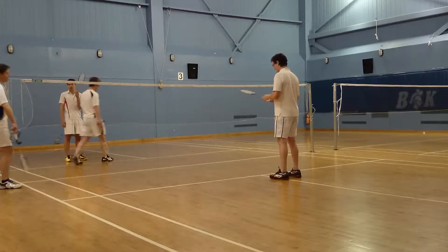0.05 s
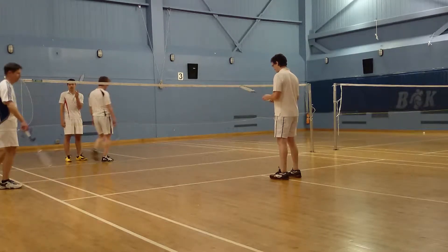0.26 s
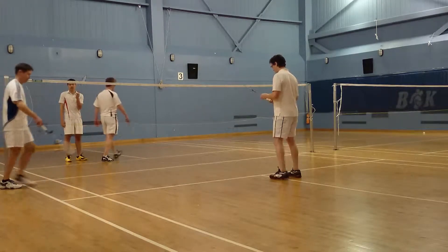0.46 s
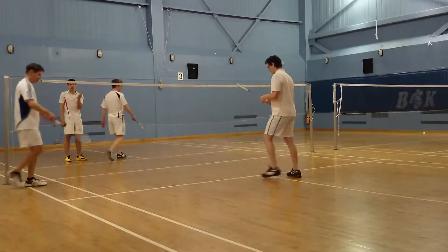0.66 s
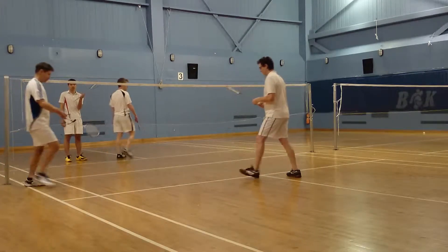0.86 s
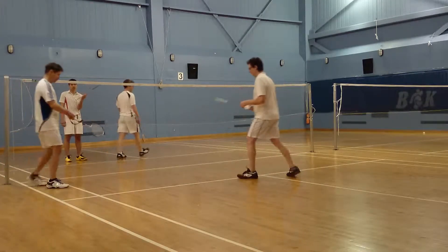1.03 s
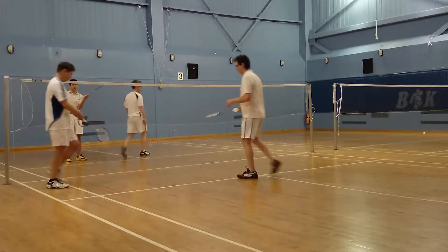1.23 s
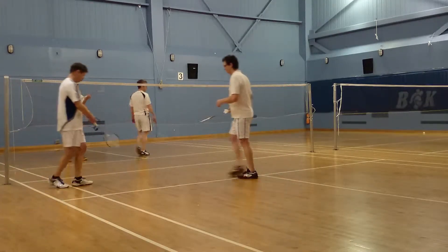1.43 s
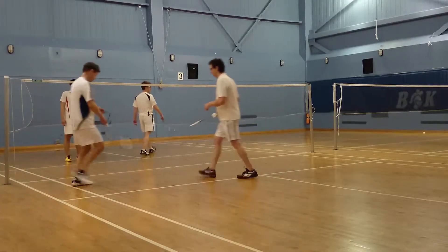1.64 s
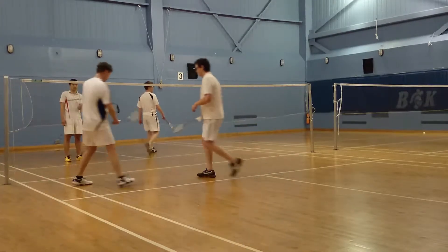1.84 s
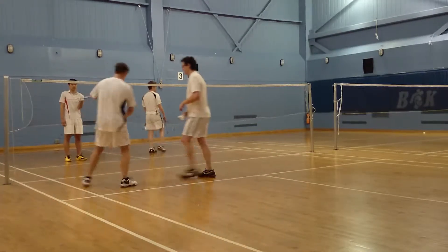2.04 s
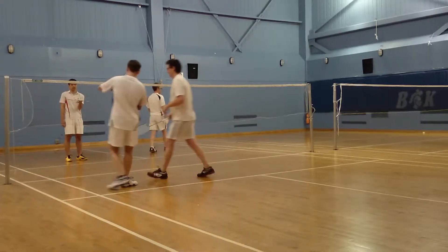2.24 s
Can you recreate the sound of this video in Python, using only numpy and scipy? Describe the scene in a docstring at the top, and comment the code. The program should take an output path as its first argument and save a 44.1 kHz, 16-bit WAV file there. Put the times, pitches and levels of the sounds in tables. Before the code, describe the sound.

Sports shoes squeak on a wooden court in a big, echoing hall. Soft, dull steps come at 0.1 seconds, with a faint chirp at 0.4. A tiny sharp squeak with taps comes at 0.6, a clearer falling squeak and thud at 1.03, and the loudest, brightest, rough chirp at 1.46. Its echo fades into faint scuffs and a soft step around 2.0, over low ventilation rumble.

```python
"""Squeaking soles of badminton players, close and far, on the wooden court of a large sports hall.
Each squeak is the rubber tread sticking and slipping for milliseconds: a rough gliding tone with harmonics.
Landings are decaying noises (tick, slap, boom of the boards); scuffs are short swells of treble noise.
The hall answers with a few echoes and a long diffuse tail, over the low rumble and air noise of ventilation.
Two microphones hear the shoes with different colour and a slight lag; a limiter and a treble cut follow."""
import sys
import numpy as np
from scipy import signal
from scipy.fft import rfft, irfft
from scipy.io import wavfile
from scipy.ndimage import uniform_filter1d, minimum_filter1d

SR = 44100
rng = np.random.default_rng(int(sys.argv[2]) if len(sys.argv) > 2 else 0)


def to_wav(sig):
    """Store sig (one row per channel, or 1-D mono) as 16-bit WAV at the path in sys.argv[1].

    Samples outside -1..1 are clipped; the rate is SR.
    """
    pcm = np.clip(np.atleast_2d(sig), -1, 1) * 32767
    pcm = np.round(pcm).astype(np.int16)
    wavfile.write(sys.argv[1], SR, pcm.T)  # frames by channels


N = 101077  # length in samples

# Colour of a sole ticking on or brushing the varnish: columns [f/Hz, relative level/dB]
VARNISH_COLOUR = [(1000, -8), (3000, 4.5), (5000, -3), (8000, -0.5), (12000, -21.5), (14500, -28)]


def undb(db):
    """Turn decibels into an amplitude factor."""
    return 10 ** (np.asarray(db) / 20)


def unit(x):
    """Scale to rms 1."""
    return x / np.sqrt(np.mean(x ** 2) + 1e-20)


def over(points, hz):
    """Read (f/Hz, value) points on a log-frequency axis."""
    f, values = np.array(points, float).T
    return np.interp(np.log(np.maximum(hz, 1)), np.log(f), values)


def bins(size):
    """Frequencies in Hz of the spectrum of a sound of this many samples."""
    return np.fft.rfftfreq(size, 1 / SR)


def tint(x, points):
    """Filter by (f/Hz, level/dB) points, padded so that the end does not wrap round."""
    padded = 2 * len(x)
    spectrum = rfft(x, padded) * undb(over(points, bins(padded)))
    return irfft(spectrum)[:len(x)]


def noise(points, size):
    """Noise coloured by (f/Hz, level/dB) points, rms 1."""
    spectrum = rfft(rng.standard_normal(size)) * undb(over(points, bins(size)))
    return unit(irfft(spectrum, size))


def wander(hz, size):
    """Smooth random movement, rolled off above a given rate, rms 1."""
    spectrum = rfft(rng.standard_normal(size)) / (1 + (bins(size) / hz) ** 4)
    return unit(irfft(spectrum, size))


def pan(db):
    """Left and right gains for a level difference; positive is louder on the left."""
    difference = np.atleast_1d(db)
    return undb(np.array([difference, -difference]) / 2)


def add(out, start, x):
    """Mix a sound in at a time in seconds, cut off at the end of the scene."""
    i = int(start * SR)
    out[..., i:i + x.shape[-1]] += x[..., :N - i]


def slide(u):
    """Force of a sliding sole over its length u = 0-1: it swells, then fades."""
    swell_share, swell_power, fade_power = 0.49, 1.38, 0.61
    rise = np.clip(u / swell_share, 0, 1)
    fall = np.clip((1 - u) / (1 - swell_share), 0, 1)
    return rise ** swell_power * fall ** fade_power


def ventilation():
    """A low tone wavering in pitch and level makes the rumble; broad stereo noise makes the air."""
    # Colour of the air noise: columns [f/Hz, relative level/dB]
    air_colour = [(20, -4.5), (35, -2), (60, -1), (87, -9), (122, -9.5), (180, -13), (240, -19),
                  (320, -31.5), (480, -31), (620, -34), (1000, -41), (2400, -47), (3000, -52),
                  (4900, -53.5), (5700, -48), (6600, -52.5), (9000, -58), (12400, -59), (14000, -67)]
    # Lean of the air noise between the microphones: columns [f/Hz, left-right level/dB]
    air_lean = [(40, -9.5), (120, -5), (300, -3), (1000, -0.5), (3000, -3.5), (5600, -6.5), (8500, 3.5),
                (14000, -2)]
    # Width of the air noise: columns [f/Hz, side against mid level/dB]
    air_width = [(60, -11), (130, -4), (300, -12.5), (700, -0.5), (14000, 0.5)]
    # Rise and fall of the rumble: columns [t/s, relative level/dB]
    rumble_course = [(0.0, -47), (0.11, -25), (0.2, -46.5), (0.33, -29), (0.4, -64), (0.45, -31.5),
                     (0.69, -37.5), (0.72, -65), (0.77, -25.5), (0.81, -43.5), (0.94, -32.5), (1.03, -46),
                     (1.25, -34), (1.46, -36.5), (1.5, -55), (1.57, -36.5), (1.61, -48.5), (2.29, -43)]
    air_db, air_dip_db = -43, -1  # the air noise is weaker around the rumble
    rumble_hz, rumble_width_hz, rumble_pan_db = 57.6, 10.95, -6.5
    rumble_db, level_waver = -4, 0.083

    t, f = np.arange(N) / SR, bins(N)
    dip = undb(air_dip_db * np.exp(-((f - rumble_hz) / (2 * rumble_width_hz)) ** 2))
    mid = rfft(noise(air_colour, N))
    side = rfft(noise(air_colour, N)) * undb(over(air_width, f))
    air = irfft(np.array([mid + side, mid - side]) * dip * pan(over(air_lean, f)), N)
    air = air * undb(air_db)

    pitch = rumble_hz + rumble_width_hz / 2 * wander(8.9, N)
    phase = 2 * np.pi * np.cumsum(pitch) / SR
    rumble = unit(np.sin(phase) * (1 + level_waver * wander(rumble_width_hz, N)))
    level = undb(rumble_db + np.interp(t, *np.array(rumble_course).T))
    return air + rumble * level * pan(rumble_pan_db)


def hall(x):
    """A few distinct echoes and a diffuse stereo tail, whose treble dies sooner than its middle."""
    # Time for the tail to fall by 60 dB: columns [f/Hz, decay time/s]
    decay_times = [(100, 0.85), (1000, 1.68), (2900, 1.223), (4400, 0.91), (5800, 0.61), (8500, 0.51),
                   (12000, 0.41), (16000, .33)]
    # Width of the tail: columns [f/Hz, side against mid level/dB]
    tail_width = [(200, -4.5), (1000, 1.5), (3000, 2), (4400, 3.5), (6000, -0.5), (12000, 2)]
    # Echoes from floor, walls and roof: columns [nominal delay/s, level/dB]
    echoes = [(.005, -7), (0.022, -16), (0.031, -15.5), (0.047, -25), (0.069, -19.5), (.110, -24.5)]
    build_s, gap_s, grain_spread = 0.012, 0.0023, 0.67

    t, f = np.arange(N) / SR, bins(N)
    grain = np.exp(grain_spread * rng.standard_normal((2, N)))  # uneven strength of the reflections
    field = rfft(unit(rng.standard_normal((2, N)) * grain))
    centres = np.geomspace(100, 16000, 20)
    tail = 0
    for hz, share in zip(centres, np.eye(len(centres))):
        band = irfft(field * np.interp(f, centres, share), N)  # overlapping bands that sum to the field
        tail = tail + band * np.exp(-np.log(1000) * t / over(decay_times, hz))
    build = 1 - np.exp(-np.maximum(t - gap_s, 0) / build_s)
    tail = tail * build / np.sqrt(SR / 10)

    mid = tail.mean(0)
    side = tint(tail[0] - mid, tail_width)
    tail = mid + side * np.array([[1], [-1]])
    for delay, db in echoes:
        for channel in tail:
            scattered = delay + 0.002 * rng.uniform(-1, 1)  # differs between the microphones
            channel[int(scattered * SR)] += undb(db)
    return signal.fftconvolve(x[None], tail, axes=1)[:, :N]


def scuffs(size=8192):
    """A sole brushes the varnish without catching: treble noise follows the force of the slide."""
    # Brushing soles: columns [t/s, length/s, relative level/dB]
    brushes = [(0.51, 0.029, -60.5), (0.6, 0.036, -47), (1.817, 0.045, -57), (2.031, 0.055, -60)]
    out, t = np.zeros(N), np.arange(size) / SR
    for start, length, db in brushes:
        add(out, start, undb(db) * slide(t / length) * noise(VARNISH_COLOUR, size))
    return out


def steps(size=16384):
    """Each landing ticks on the varnish, slaps and sets the sprung boards booming: three decaying noises."""
    # Landing soles: columns [t/s, relative boom level/dB, slap level/dB, tick level/dB]
    landings = [(0.058, -42, -68, -80), (.134, -41.5, -41, -62), (0.5826, -47, -35, -33.5),
                (.616, -45, -39, -62), (.70, -57.5, -42.5, -65.5), (.76, -46.5, -60.5, -76),
                (1.0195, -45, -35, -33.5), (1.048, -32.5, -41.5, -50.5), (1.451, -51.5, -37, -34.5),
                (1.476, -44.5, -46, -49), (2.005, -46, -40, -67.5)]
    # Colour of the booming boards: columns [f/Hz, relative level/dB]
    boom_colour = [(40, -32), (80, 14.5), (130, 9), (220, -10), (350, -8), (600, -19.5), (2000, -55.5)]
    # Colour of the slap: columns [f/Hz, relative level/dB]
    slap_colour = [(150, 7), (500, -7.5), (900, 1), (1300, -5), (2000, -13), (4000, -21.5), (8000, -36.5),
                   (14000, -53.5)]
    boom_s, slap_s, tick_s = 0.05, 0.0044, 0.0019  # decay time constants
    onset_share = 0.12  # time constant of the onset as a share of the decay

    out, t = np.zeros(N), np.arange(size) / SR
    for start, boom_db, slap_db, tick_db in landings:
        parts = ((boom_colour, boom_s, boom_db),
                 (slap_colour, slap_s, slap_db),
                 (VARNISH_COLOUR, tick_s, tick_db))
        for colour, decay, db in parts:
            envelope = np.exp(-t / decay) * (1 - np.exp(-t / (onset_share * decay)))
            add(out, start, undb(db) * envelope * noise(colour, size))
    return out


def squeaks(size=4096):
    """Stick-slip makes the tread blocks sing: a rough gliding tone, its harmonics and rubbing noise."""
    # Singing tread blocks: columns [t/s, length/s, start f/Hz, end f/Hz, relative level/dB,
    # 2nd, 3rd and 4th harmonic relative level/dB, pitch roughness/share,
    # left-right level/dB, level sent to the hall/dB]
    slips = [ (0.105, 0.007, 6230, 4890, -48.5, -4, -36.5, -40, 0.034, 8, -2),
             (0.393, 0.0072, 4730, 4700, -55.5, -17, -49.5, -40, .015, 2, -3),
             (0.581, 0.004, 5290, 4330, -46.5, -14, -31, -27, .04, -10, 13.5),
             (.619, 0.019, 3336, 3028, -30.5, -10.5, -31, -32, 0.027, -5, 10.5),
             (.620, 0.011, 4327, 4344, -19, -36, -45, -43, 0.025, -3.5, -4.5),
             (0.621, 0.013, 2883, 2810, -37.5, -15, -9, -24, 0.028, 11, 13.5),
             (1.037, 0.026, 3414, 3120, -19, -16, -31, -45.5, 0.011, 9.5, 0.5),
             (1.033, .010, 4090, 3470, -28.5, -23, -32.5, -42, 0.025, -5, 4),
             (1.46, 0.02, 3117, 2777, -21.5, -1, -9.5, -17.5, 0.033, 7, 10.5),
             (1.461, 0.017, 4784, 4325, -19, -12.5, -27, -36, .035, -4.5, 1),
             (1.462, 0.0047, 7500, 7460, -25, -24, -40.5, -34.5, .028, -2.5, 6),
             (1.467, 0.013, 5827, 5572, -8.5, -24, -52, -35, 0.024, -6.5, -5.5),
             (1.473, 0.0048, 8360, 8250, -24, -40, -38, -39, 0.016, 18.5, -17),
             (2.051, 0.0142, 5700, 6680, -51.5, -14, -23.5, -40, 0.014, 2, 2),
             (2.06, 0.014, 4580, 5780, -58, -9, -25, -39, .03, -6, -9),
             (2.095, 0.0073, 4790, 6180, -60, -7, -27.5, -46.5, 0.053, 7, -6)]
    # A block passes little below its lowest mode: columns [f/lower end of the glide, level/dB]
    block_response = [(.7, -38.5), (.85, -20.5), (.96, 1.5), (1.05, -0.5), (3.2, -1), (5, -4)]
    # Colour of the rubbing noise: columns [f/Hz, relative level/dB]
    rasp_colour = [(300, -6), (1200, 1.5), (2100, 8), (4000, -35.5), (6000, 23.5), (8000, 1.5),
                   (12000, -13), (15500, -21)]
    unsteady_hz, shimmer, rasp_db = 815, 0.22, -22.5  # shimmer is a share of the level

    near, far, t = np.zeros((2, N)), np.zeros(N), np.arange(size) / SR
    for start, length, hz0, hz1, db, h2, h3, h4, rough, pan_db, hall_db in slips:
        u = np.clip(t / length, 0, 1)
        glide = hz0 + (hz1 - hz0) * u
        phase = 2 * np.pi * np.cumsum(glide * (1 + rough * wander(unsteady_hz, size))) / SR
        tone = sum(undb(h) * np.sin(k * phase) for k, h in enumerate((0, h2, h3, h4), 1))
        tone = tone * (1 + shimmer * wander(unsteady_hz, size))
        tone = tint(slide(u) * tone, np.array(block_response) * [min(hz0, hz1), 1])
        rasp = undb(rasp_db) * np.sqrt(slide(u)) * noise(rasp_colour, size)
        squeak = undb(db) * (tone + rasp)
        add(near, start, squeak * pan(pan_db))
        add(far, start, squeak * undb(hall_db))
    return near, far


def scene():
    """Shoes heard directly and through the hall, coloured differently at the two microphones."""
    # Difference between the microphones: columns [f/Hz, left-right level/dB]
    microphone_lean = [(100, -4.5), (500, 0.5), (1300, -2), (3000, -2), (4400, -3), (5600, -15),
                       (6400, -6.5), (7300, 12.5), (8500, 12), (12000, 9.5), (15500, -12.5)]
    step_hall_db, scuff_hall_db = 3.5, 4  # levels sent to the hall
    lag_s = 0.00018  # the right microphone hears the shoes later than the left

    near, far = squeaks()
    landing, brushing = steps(), scuffs()
    sent = far + undb(step_hall_db) * landing + undb(scuff_hall_db) * brushing
    shoes = near + landing + brushing + hall(sent)
    f = bins(2 * N)
    lag = np.exp(-2j * np.pi * f * lag_s * np.array([[0], [1]]))
    shoes = irfft(rfft(shoes, 2 * N) * lag * pan(over(microphone_lean, f)))[:, :N]
    return shoes + ventilation()


def record(dry):
    """The recorder's limiter holds down both channels together, then a steep filter cuts the top."""
    ceiling, top_hz = 0.78, 15600  # the ceiling is full-scale amplitude ahead of the filter
    gain = np.minimum(1, ceiling / (np.abs(dry).max(0) + 1e-9))
    gain = uniform_filter1d(minimum_filter1d(gain, size=89), size=89)  # 2 ms windows
    low_pass = signal.ellip(10, .2, 80, top_hz, fs=SR, output="sos")
    return signal.sosfilt(low_pass, dry * gain)


dry = scene()
out = record(dry)
to_wav(out)
```